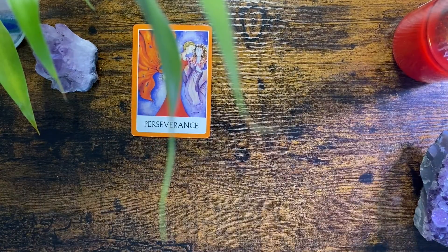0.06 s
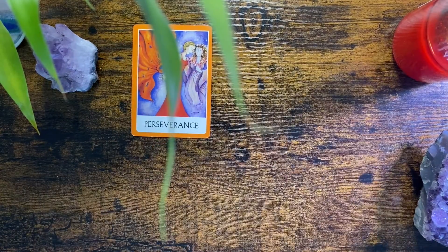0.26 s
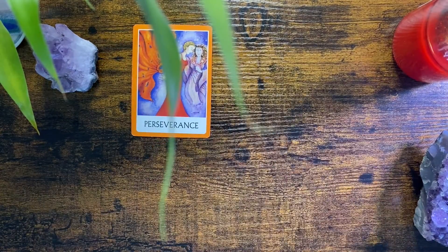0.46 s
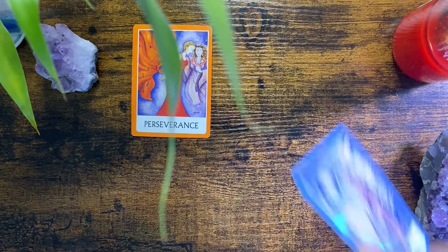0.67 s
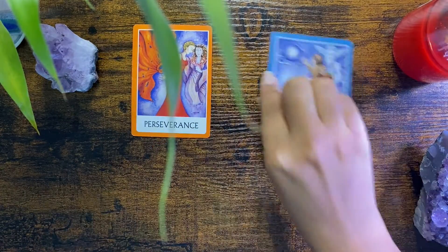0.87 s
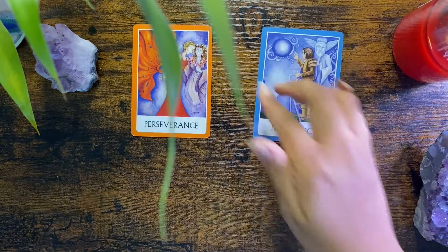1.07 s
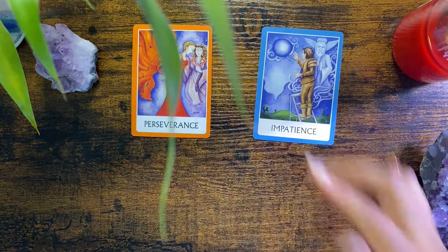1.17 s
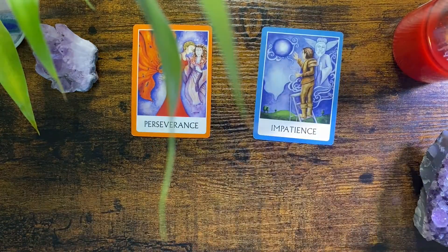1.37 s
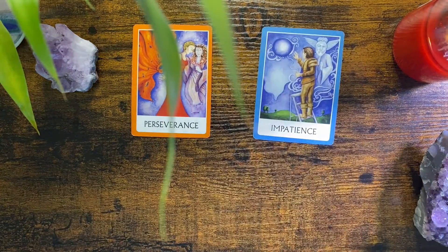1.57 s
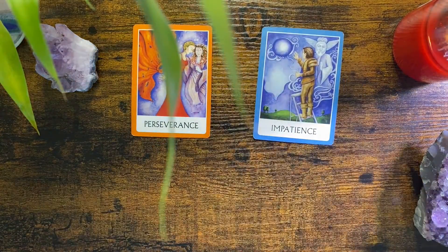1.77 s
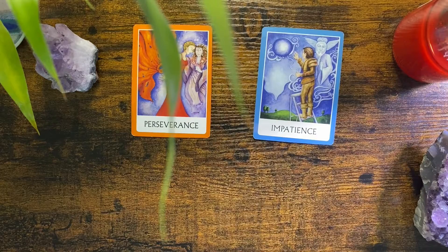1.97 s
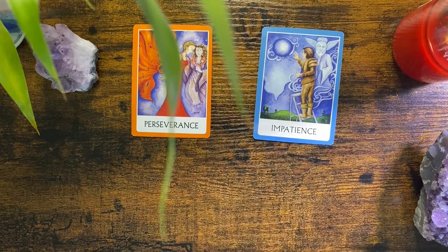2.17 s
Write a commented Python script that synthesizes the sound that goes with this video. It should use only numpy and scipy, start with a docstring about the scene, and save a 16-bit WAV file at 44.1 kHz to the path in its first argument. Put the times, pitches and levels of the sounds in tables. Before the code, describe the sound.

Stiff cards clicking and rubbing, with one snapped down on a wooden table.

```python
"""Stiff cards are handled over a wooden table, close by, in a small room with a faint hum.
First a packet is cut and closed: edges click, and squeezed-out air makes soft thumps.
Next one card slides off with a papery rub, touches down and is snapped flat, ringing as it springs back.
Last the deck is picked up and worked in the hands: it rumbles and knocks, and the table top rings low."""
import sys
import numpy as np
from scipy import signal
from scipy.fft import rfft, irfft
from scipy.io import wavfile
from scipy.ndimage import uniform_filter1d

SR = 44100
rng = np.random.default_rng(int(sys.argv[2]) if len(sys.argv) > 2 else 0)


def digitize_waveform(pressure):
    """Quantize a signal to 16-bit integers and store it at the path in sys.argv[1].

    Rows of a 2-D input are taken as channels; values are limited to [-1, 1].
    """
    field = np.atleast_2d(pressure).T
    bounded = np.clip(field, -1, 1)
    quanta = np.round(bounded * 32767).astype(np.int16)
    wavfile.write(sys.argv[1], SR, quanta)


N = 99225

# tones of the hum: f/Hz, level/dB
HUM_TONES = [(204.5, -52.5), (305.5, -59)]
# tone colour of the quiet room air: f/Hz, relative level/dB
AIR_COLOUR = [(30, -17), (130, -16), (200, -3), (300, -8), (500, -13), (700, -29), (1000, -30), (1600, -26),
              (2800, -26), (6000, -40), (15000, -52)]
# tone colour of the room's echo: f/Hz, relative level/dB
ECHO_COLOUR = [(60, 35.5), (250, 11.5), (900, 0), (2800, 2), (7500, 9.5), (15000, -3)]
# how the rumble of the handled deck rises and falls: t/s, level/dB
RUMBLE_LEVELS = [(1.418, -45.5), (1.448, -47), (1.535, -66), (1.556, -27), (1.66, -33), (1.71, -36.5),
                 (1.787, -29), (1.857, -42.5), (1.958, -27.5), (2.05, -41), (2.11, -37.5), (2.15, -49),
                 (2.189, -41.5), (2.25, -44.5)]
# tone colour of that rumble: f/Hz, relative level/dB
RUMBLE_COLOUR = [(25, -25), (58, -0.5), (85, -18), (125, 1.5), (170, -9.5), (210, 4), (260, 1.5), (320, 1),
                 (430, -7), (560, -18), (900, -26), (4000, -62)]
# blows on the table: t/s, level/dB, f/Hz, strength of the table's ring/dB
TABLE_KNOCKS = [(.232, -27.5, 307, 3.5), (0.4643, -21, 150, -14), (0.4848, -17, 357, -18),
                (0.735, -30, 511, -20.5), (0.826, -19.5, 640, -9.5), (0.8747, -25.5, 367, -7),
                (1.0219, -12, 427, 1.5), (1.0323, -14.5, 406, -19), (1.440, -37, 246, -3.5),
                (1.5516, -15, 273, -3), (1.559, -22.5, 304, -16), (1.566, -22, 185, -4),
                (1.607, -21.5, 237, -3.5), (1.6353, -20.5, 310, -7), (1.645, -17.5, 312, -0.5),
                (1.652, -14.5, 253, -11), (1.733, -12, 281, -8.5), (1.796, -24, 175, -12),
                (1.924, -36, 277, -25), (1.998, -23.5, 265, -22), (2.089, -31.5, 317, -12),
                (2.176, -34.5, 215, -4)]
# notes at which the table top rings: f/Hz, relative level/dB, time to fade by 60 dB/s
TABLE_NOTES = [(65.6, -16.5, .3), (108, -4.5, 0.076), (136.7, 3, 0.21), (211, 9, 0.13), (263.3, -8.5, 0.2),
               (318, -17.5, 0.16), (352, 3.5, 0.018), (444.7, 1, 0.13), (531, -2.5, 0.088),
               (1173, 14, 0.039)]
# air squeezed out as packets close: t/s, level before filtering/dB, rise and fall time/ms
AIR_PUFFS = [(0.2511, 4, 1.09), (.336, -18.5, 3.7), (0.385, -15, 4.5), (0.4697, -4, 1.1), (0.4816, -5, 1.7),
             (0.545, -32, 3.9), (0.632, -23.5, 0.45), (0.8337, -13, 5.7), (0.8734, -22.5, 1.5),
             (1.0232, -8, 1.5), (1.0309, -20.5, 1.6), (1.429, -16.5, 1.07), (2.189, -22.5, 1)]
# pitch bands that a card favours: f/Hz, width/Hz, strength/dB
CARD_RESONANCES = [(1050, 300, -15), (1975, 255, -13.5), (2590, 730, -5.5), (3427, 3300, -6),
                   (4700, 440, -9), (6620, 2400, -4), (8720, 1100, -13), (11500, 470, -25.5)]
# rasps of a dragged card, pitched by how it is held: t/s, length/s, f/Hz, width/Hz, level/dB
CARD_RASPS = [(0, 0.26, 555, 240, -51.5), (0.13, .09, 1900, 300, -56), (0.371, 0.11, 310, 300, -43),
              (0.39, 0.017, 5400, 895, -35), (0.458, 0.002, 2570, 300, -28.5), (0, 0.19, 11250, 2530, -64),
              (0.638, 0.044, 2380, 900, -44.5), (.905, 0.045, 3150, 706, -54.5),
              (0.959, 0.035, 3140, 450, -44), (1.095, 0.039, 2700, 834, -54),
              (1.807, 0.066, 2380, 610, -44), (0.84, 0.011, 3610, 890, -41.5),
              (1.742, 0.065, 318, 141, -29.5)]
# card faces rubbing: t/s, length/s, low level/dB, middle level/dB, high level/dB
FACE_RUBS = [(-.025, 0.13, -51.5, -53.5, -53), (0.093, .11, -59, -56, -58),
             (0.211, 0.045, -41, -42.5, -42.5), (0.274, 0.2, -49.5, -60, -53),
             (0.366, 0.048, -53, -38, -34.5), (0.411, 0.046, -35, -41, -33.5),
             (0.475, 0.086, -51.5, -56.5, -51), (0.569, 0.061, -50, -51.5, -45.5),
             (0.626, 0.053, -46, -50.5, -50), (0.721, 0.11, -70, -71, -65), (0.822, 0.069, -46, -56, -51.5),
             (0.888, 0.033, -45.5, -46.5, -38.5), (0.911, 0.076, -52.5, -50, -47),
             (1.007, 0.039, -36.5, -48, -30.5), (1.111, 0.042, -56.5, -55.5, -59.5),
             (1.419, 0.044, -50, -49, -47.5), (1.458, 0.052, -64, -64, -56),
             (1.545, 0.044, -45.5, -52.5, -48.5), (1.599, 0.031, -35, -43.5, -40),
             (1.70, 0.04, -38, -40, -41), (1.744, 0.055, -34.5, -48, -34.5),
             (1.828, 0.068, -51, -57.5, -42.5), (1.887, 0.11, -43.5, -54.5, -54),
             (1.936, 0.028, -37.5, -44.5, -38.5), (1.981, 0.055, -54.5, -83, -56),
             (2.075, 0.037, -50.5, -65, -53), (2.141, 0.097, -56.5, -65, -63)]
# bent cards springing back, with notes that depend on bend and grip:
# t/s, time for the lowest note to fade by 60 dB/s, list of (f/Hz, level/dB)
CARD_SPRINGS = [(0.0437, 0.0091, [(2200, -28.5)]), (.2342, 0.029, [(1290, -21), (2100, -26.5),
                (3520, -24)]), (.2502, 0.017, [(1420, -22), (1950, -14), (2900, -16), (3520, -18)]),
                (.4543, 0.011, [(2350, -14.5)]), (.4580, 0.017, [(1110, -15.5)]),
                (.4840, 0.024, [(1060, -16.5), (1300, -16.5), (1870, -13.5), (2600, -18.5), (4900, -14)]),
                (.6279, 0.035, [(820, -24), (1180, -23.5), (2750, -23.5), (3650, -34)]),
                (.8252, 0.09, [(630, -26), (900, -30.5), (1130, -30.5), (1800, -30.5), (3400, -27),
                (7000, -31.5)]), (.876, 0.04, [(877, -28), (1060, -42)]), (1.0210, 0.034, [(1080, -15),
                (1250, -17), (3080, -16.5), (3450, -16.5), (3820, -20.5), (6500, -14), (7000, -10),
                (8340, -14)]), (1.616, 0.036, [(1560, -31.5)]), (1.6770, 0.02, [(1550, -33), (2050, -30)]),
                (1.7325, 0.031, [(1310, -18.5), (1700, -30), (2720, -43), (3900, -18.5)])]
# card edges clicking: t/s, low level/dB, middle level/dB, high level/dB, decay time/ms
EDGE_CLICKS = [(0.043, -40, -53, -54, 0.73), (.2340, -49, -35, -43, 0.68), (.2500, -35, -30, -26.5, 2),
               (0.3649, -60, -46, -26.5, 0.67), (0.383, -33, -40, -50, 4), (.4540, -19.5, -48, -42, 1.15),
               (0.4625, -31, -52, -31, 3.2), (0.466, -39, -26, -34, 1.5), (0.4835, -21.5, -26, -22.5, 2),
               (0.4913, -24.5, -53, -54, 1), (0.6279, -27.5, -31, -30.5, 1.7), (0.733, -57, -65, -61, 31),
               (0.8247, -47, -35.5, -41, 5.5), (.8330, -41, -44, -39.5, 3.6), (0.8408, -37, -59, -42.5, 9),
               (.8750, -41, -54, -62, 1.4), (1.003, -43, -52, -43.5, 9.4), (1.0204, -28, -30, -14, 4.3),
               (1.0251, -18.5, -31, -19.5, 0.77), (1.0315, -48, -60, -27, 2.2),
               (1.108, -48.5, -50.5, -54, 20), (1.4242, -61, -50.5, -67, 5.8), (1.44, -42, -53, -46, 8.1),
               (1.5503, -40, -75, -65, 7.6), (1.6145, -37.5, -39.5, -40.5, 4.7),
               (1.672, -39.5, -65.5, -43, 11), (1.698, -33.5, -40, -39, 3), (1.7265, -35.5, -43, -39, 8.6),
               (1.732, -27, -23.5, -28, 3), (1.9503, -45, -38.5, -46.5, 12), (2.0856, -57, -58, -51, 2.9),
               (2.1560, -65, -65, -60, 7.7), (2.176, -51, -64, -61, 14), (2.2340, -55, -54, -61, 1.1)]
# tone colour of the microphone: f/Hz, gain/dB
MIC_COLOUR = [(4100, 0), (5200, -6.5), (6400, 0), (7200, 1), (9500, -1), (13000, 2.5)]

HUM_WAVER_HZ, HUM_WAVER_DB, AIR_DB = 6, 2.5, -56
ECHO_DB, ECHO_T60_S, ECHO_ONSET_S = -13.5, 0.29, 0.008  # T60 is the time to fade by 60 dB
KNOCK_PEAK_CYCLES, TABLE_DB = 0.59, -6
THUMP_CUT_HZ, THUMP_RING_HZ, THUMP_T60_S, THUMP_RING_DB = 53.4, 100.5, .11, -12.5
LOW_HZ, MIDDLE_HZ, HIGH_HZ, TOP_HZ = 543, 1700, 4450, 10640  # borders of a card's three bands
RUB_GRIT, RUB_ATTACK_S, RUB_RELEASE_S, RUB_FLUTTER_DB = .33, 0.053, 0.021, 1
SPRING_DAMPING = 0.34  # the larger this is, the sooner high notes fade
CLICK_GRIT, CLICK_RISE_MS = .3, .2
PEAK_LIMIT, LOW_CUT_HZ, HIGH_CUT_HZ = .85, 41, 15150


def undb(db):
    """Turn decibels into a number to multiply by."""
    return 10 ** (np.asarray(db) / 20)


def unit(x):
    """Scale a sound to an average (rms) level of 1."""
    return x / np.sqrt(np.mean(x ** 2) + 1e-20)


def add(out, start, x):
    """Mix a sound in at a time in seconds."""
    i = max(int(start * SR), 0)
    out[i:i + len(x)] += x[:max(len(out) - i, 0)]


def colour(x, points):
    """Turn pitches up or down along a curve of (f/Hz, gain/dB) points."""
    hz, db = np.array(points).T
    f = np.maximum(np.fft.rfftfreq(len(x), 1 / SR), 1)
    return irfft(rfft(x) * undb(np.interp(np.log(f), np.log(hz), db)), len(x))


def resonate(x, hz, width):
    """Keep the band around one pitch and weaken the rest."""
    return signal.lfilter(*signal.iirpeak(hz, hz / width, SR), x)


def ring(hz, t60):
    """One struck note that fades by 60 dB in t60 seconds."""
    t = np.arange(N // 4) / SR
    return np.sin(2 * np.pi * hz * t) * np.exp(-np.log(1000) * t / t60)


def drift(size):
    """A random wander of about 1 either way, smoothed over `size` samples."""
    return unit(uniform_filter1d(uniform_filter1d(rng.standard_normal(N), size), size))


def background():
    """Quiet room air with a slightly wavering hum."""
    hum = np.zeros(N)
    for hz, db in HUM_TONES:
        gain = undb(db + HUM_WAVER_DB * drift(size=2000))
        pitch = hz + HUM_WAVER_HZ * drift(size=2000)
        hum += gain * unit(np.sin(2 * np.pi * np.cumsum(pitch) / SR))
    return hum + undb(AIR_DB) * unit(colour(rng.standard_normal(N), AIR_COLOUR))


def room_echo(x):
    """A small furnished room answers with a short, blurred echo."""
    t = np.arange(N // 4) / SR
    envelope = np.exp(-np.log(1000) * t / ECHO_T60_S) * np.minimum(t / ECHO_ONSET_S, 1) ** 2
    tail = colour(rng.standard_normal(len(t)), ECHO_COLOUR) * envelope
    return undb(ECHO_DB) * signal.fftconvolve(x, unit(tail) / np.sqrt(len(t)))[:N]


def deck_rumble():
    """The deck rumbles as it drags and jostles between fingers and table."""
    times, db = np.array(RUMBLE_LEVELS).T
    envelope = undb(np.interp(np.arange(N) / SR, times, db, left=-np.inf))
    return unit(colour(rng.standard_normal(N), RUMBLE_COLOUR)) * envelope


def table_knocks():
    """Fingers and deck hit the table: a few fading swings, then the top rings."""
    t, blows, force = np.arange(N) / SR, np.zeros(N), np.zeros(N)
    for start, db, hz, ring_db in TABLE_KNOCKS:
        cycles = np.maximum(t - start, 0) * hz
        age = cycles / KNOCK_PEAK_CYCLES
        envelope = age * np.exp(1 - np.minimum(age, 20))
        push = undb(db) * np.sin(2 * np.pi * cycles) * envelope
        blows += push
        force += push * undb(ring_db) * 2 * hz / SR
    top = sum(undb(db) * ring(hz, t60) for hz, db, t60 in TABLE_NOTES)
    return blows + undb(TABLE_DB) * signal.fftconvolve(force, top)[:N]


def packet_thumps():
    """Closing packets push out a puff of air and leave a short, low ring."""
    t = np.arange(N) / SR
    puffs = -sum(undb(db) * np.exp(-np.abs(t - at) * 1000 / ms) for at, db, ms in AIR_PUFFS)
    puffs = signal.sosfiltfilt(signal.butter(2, THUMP_CUT_HZ, "high", fs=SR, output="sos"), puffs)
    tail = signal.fftconvolve(puffs, ring(THUMP_RING_HZ, THUMP_T60_S))[:N] * np.pi * THUMP_RING_HZ / SR
    return puffs + undb(THUMP_RING_DB) * tail


def grit(size, spread):
    """Paper fibres catch unevenly: noise whose strength jumps every 8 samples."""
    noise = rng.standard_normal(size)
    catches = np.repeat(rng.standard_normal(size // 8 + 1), 8)[:size]
    return noise * np.exp(spread * catches)


def card_bands(force):
    """A pushed card vibrates; its sound comes back as a low, a middle and a high band."""
    x = force
    for hz, width, db in CARD_RESONANCES:
        x = x + undb(db) * resonate(x, hz, width)
    bands = (LOW_HZ, MIDDLE_HZ), (MIDDLE_HZ, HIGH_HZ), (HIGH_HZ, TOP_HZ)
    return [signal.sosfilt(signal.butter(2, band, "band", fs=SR, output="sos"), x) for band in bands]


def card_rasps(fade_s=0.0087):
    """A card held taut sings around one pitch while it is dragged."""
    t, out = np.arange(N) / SR, np.zeros(N)
    for start, length, hz, width, db in CARD_RASPS:
        time_outside = np.maximum(np.maximum(start - t, t - start - length), 0)
        envelope = np.exp(-(time_outside / fade_s) ** 2)
        rasp = resonate(resonate(grit(N, RUB_GRIT), hz, width), hz, width)
        out += undb(db) * envelope * unit(rasp)
    return out


def face_rubs():
    """Card rubs on card or wood: each stroke swells and then dies away."""
    t, power = np.arange(N) / SR, np.zeros(N)
    flutter = undb(RUB_FLUTTER_DB * drift(size=300))
    bands = [unit(x) for x in card_bands(grit(N, RUB_GRIT) * flutter)]
    for start, length, *levels in FACE_RUBS:
        swell = np.clip((t - start) / RUB_ATTACK_S + .5, 0, 1) ** 2
        fade = np.exp(-np.maximum(t - start - length, 0) / RUB_RELEASE_S)
        power = power + (undb(levels)[:, None] * swell * fade) ** 2
    low, middle, high = np.sqrt(power) * bands
    return low - middle + high  # the minus sign joins the bands smoothly


def card_springs():
    """A bent card springs back and rings; its higher notes die sooner."""
    out = np.zeros(N)
    for start, t60, notes in CARD_SPRINGS:
        lowest_hz = notes[0][0]
        for hz, db in notes:
            add(out, start, undb(db) * ring(hz, t60 * (lowest_hz / hz) ** SPRING_DAMPING))
    return out


def edge_clicks():
    """A card's edge slips free with a crack that dies in milliseconds."""
    out, t = np.zeros(N), np.arange(4096) / SR
    for start, *levels, decay_ms in EDGE_CLICKS:
        envelope = np.exp(-t * 1000 / decay_ms) * (1 - np.exp(-t * 1000 / CLICK_RISE_MS))
        gain = np.sqrt(np.mean(envelope ** 2)) * 2  # keeps unit() from boosting short clicks
        bands = card_bands(grit(len(t), CLICK_GRIT) * envelope)
        low, middle, high = (undb(db) * unit(x) for db, x in zip(levels, bands))
        add(out, start, gain * (low - middle + high))
    return out


def scene():
    """Mix the card sounds with the room; the thumps and the background get no echo."""
    near = edge_clicks() + card_springs() + face_rubs() + card_rasps() + table_knocks() + deck_rumble()
    return (near + room_echo(near) + packet_thumps() + background())[None]


def record(dry):
    """The microphone colours the treble; loud peaks are rounded, the lowest and highest pitches cut."""
    x = colour(dry[0], MIC_COLOUR)[None]
    x = PEAK_LIMIT * np.tanh(x / PEAK_LIMIT)
    x = signal.sosfiltfilt(signal.butter(2, LOW_CUT_HZ, "high", fs=SR, output="sos"), x)
    return signal.sosfilt(signal.ellip(10, .2, 80, HIGH_CUT_HZ, fs=SR, output="sos"), x)


dry = scene()
out = record(dry)
digitize_waveform(out)
```